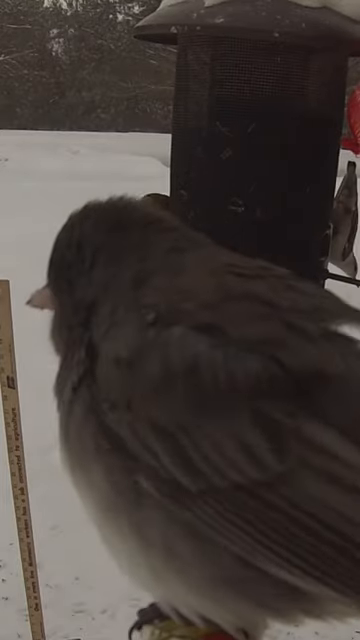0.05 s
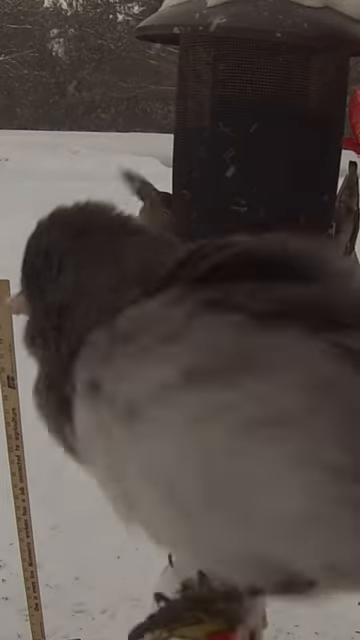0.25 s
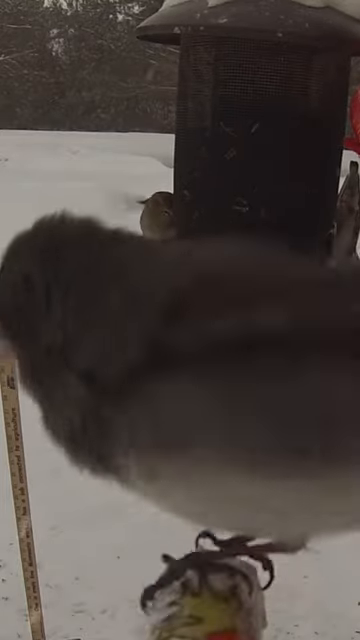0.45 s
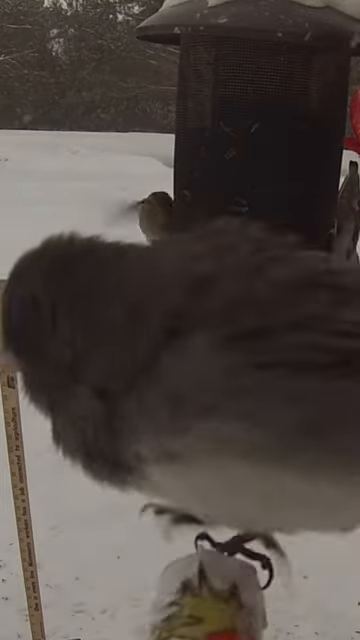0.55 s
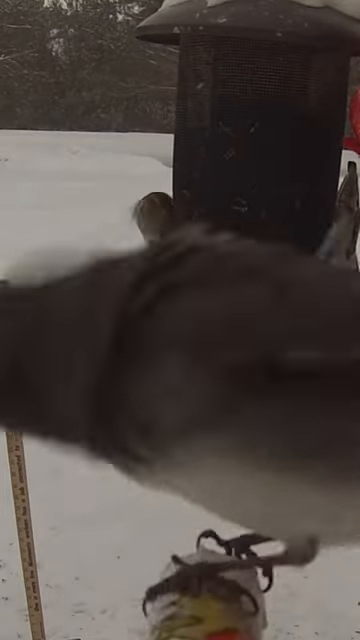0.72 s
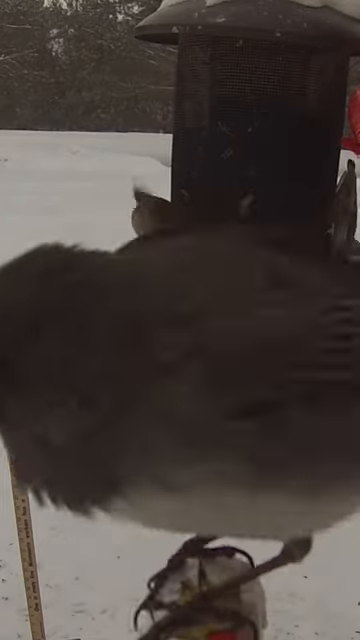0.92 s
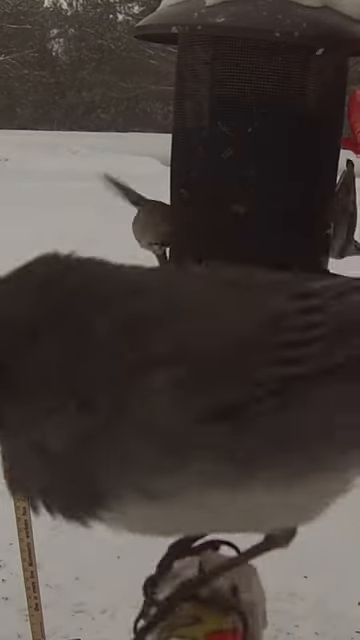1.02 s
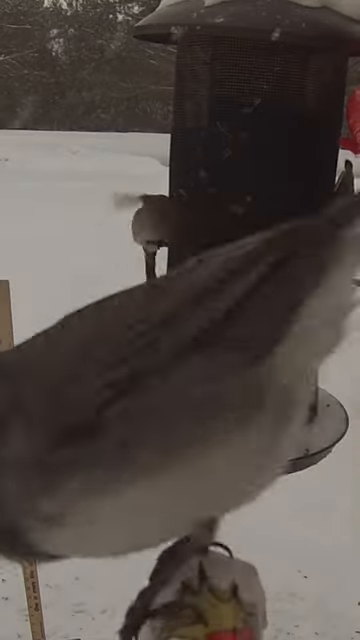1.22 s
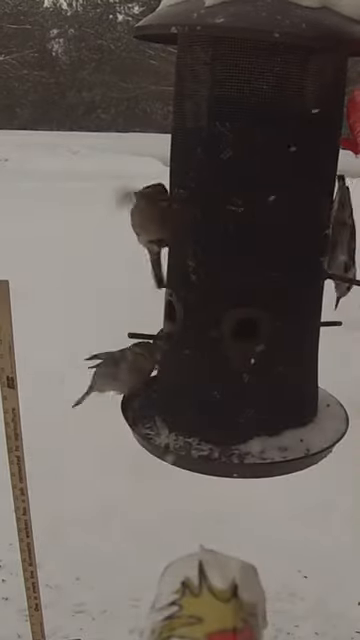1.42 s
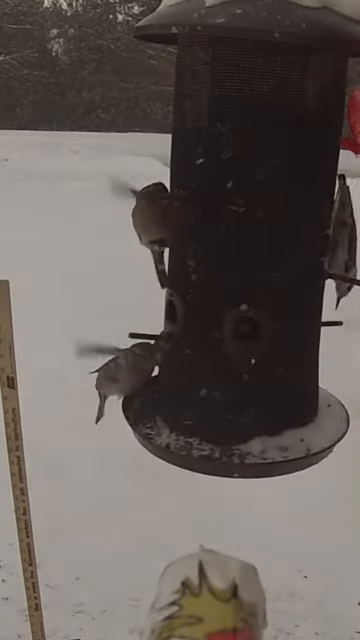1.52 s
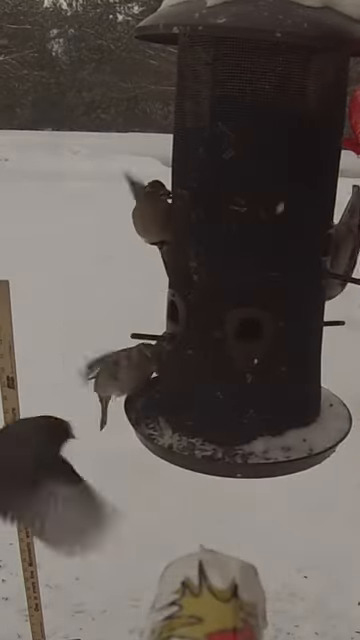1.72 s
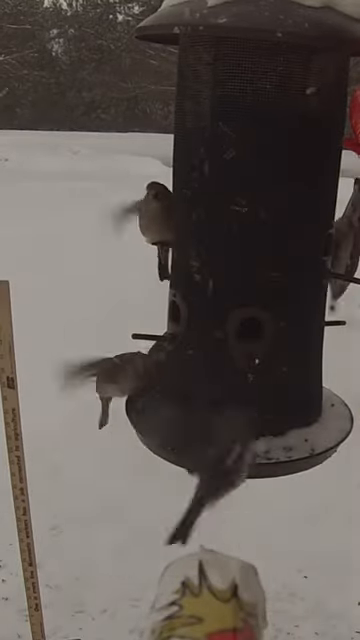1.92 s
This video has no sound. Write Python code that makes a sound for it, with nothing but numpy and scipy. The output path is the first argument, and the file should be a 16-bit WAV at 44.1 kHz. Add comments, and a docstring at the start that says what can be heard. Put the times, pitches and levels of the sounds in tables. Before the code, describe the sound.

A small bird shuffles on a perch right at the microphone, its claws tapping and scraping in quick, rattling clusters. It then flies off with soft wing thumps, leaving tiny ticks of icy snow over a faint outdoor rumble.

```python
"""Outdoors in falling snow, over a low, distant rumble, a small bird shuffles round on a perch fixed to
the microphone housing. Its feet knock, its claws scrape and its toes rub, and the perch rings with them.
It flicks a wing for balance, rustles its feathers and takes a few last steps. At about 1.3 s it leaves,
its wings pushing air on the microphone. Tiny icy ticks, sparse until then, go on landing close by."""
import sys
import numpy as np
from scipy import signal
from scipy.fft import rfft, irfft
from scipy.io import wavfile

SR = 44100
rng = np.random.default_rng(int(sys.argv[2]) if len(sys.argv) > 2 else 0)


def transcribe(signal):
    """Save signal, clipped to [-1, 1], as a 16-bit WAV file at the path in sys.argv[1]."""
    frames = np.atleast_2d(signal).T
    limited = np.clip(frames, -1, 1)
    pcm = np.round(limited * 32767).astype(np.int16)
    wavfile.write(sys.argv[1], SR, pcm)


N = 85995
T = np.arange(N) / SR


def from_db(db):
    """Decibels to gain."""
    return 10 ** (np.asarray(db) / 20)


def rms_one(x):
    """Scale to unit power."""
    return x / np.sqrt(np.mean(x ** 2) + 1e-20)


def decay(t60):
    """Gain per sample of a tail that falls 60 dB in t60 seconds."""
    return from_db(-60 / (t60 * SR))


def cut(x, hz, kind, order=1):
    """Butterworth low- or high-pass."""
    return signal.sosfilt(signal.butter(order, hz, kind, fs=SR, output="sos"), x + 1e-18)


def click(start):
    """A unit impulse at a time in seconds."""
    return 1. * (np.arange(N) == int(start * SR))


def ring(x, hz, t60):
    """A resonator: a click sets off a dying sine."""
    fall, turn = decay(t60), 2 * np.pi * hz / SR
    return signal.lfilter([0, np.sin(turn)], [1, -2 * fall * np.cos(turn), fall * fall], x + 1e-18)


def noise(spectrum):
    """Unit-power noise coloured by an EQ curve of (Hz, dB) points."""
    hz, db = np.transpose(spectrum)
    bins_hz = np.maximum(np.fft.rfftfreq(N, 1 / SR), 1)
    eq = from_db(np.interp(np.log(bins_hz), np.log(hz), db))
    return rms_one(irfft(rfft(rng.standard_normal(N)) * eq, N))


def swells(rows, rise):
    """A rounded rise and fall for each (start, length, dB); rise is the attack's share of the length."""
    envelope = np.zeros(N)
    for start, length, db in rows:
        triangle = np.interp(T, [start, start + rise * length, start + length], [0, 1, 0])
        envelope += from_db(db) * np.sin(np.pi / 2 * triangle)
    return envelope


# The colours of the outdoor air and the rumble. Each row: frequency in Hz, relative level in dB.
AIR = [(15, -25), (25, 0.5), (71, -5), (164, 0.5), (209, -3), (274, -1.5), (399, -12.5), (802, -8.5),
       (1170, -22), (2000, -23.5), (2350, -26), (2690, -27), (3160, -27), (13500, -42.5), (15400, -55)]
RUMBLE = [(20, -5), (80, -22.5), (105, 2), (124, -12), (150, -1), (220, -22), (285, -13), (360, -19.5),
          (700, -26), (2000, -70.5)]
# The rumble's fader ride. Each row: time in seconds, level in dB.
RUMBLE_LEVEL = [(0, -74), (.11, -47.5), (.35, -43.5), (.6, -47.5), (1.0, -48.5), (1.25, -52), (1.6, -59),
                (1.95, -51.5)]


def background(air_db=-53.5):
    """A steady bed of distant air under a low rumble that swells and ebbs."""
    rumble_gain = from_db(np.interp(T, *np.transpose(RUMBLE_LEVEL)))
    return from_db(air_db) * noise(AIR) + rumble_gain * noise(RUMBLE)


# Icy snow landing. Each row: start in seconds, ring level in dB, pitch in Hz, ring t60 in seconds,
# crackle level in dB.
TICKS = [(.2442, -35.5, 11200, 0.0015, -64), (.651, -44, 5460, .004, -44.5),
         (1.0855, -54, 6000, 0.0036, -50), (1.3095, -48.5, 1440, 0.0094, -58),
         (1.3845, -53, 12300, .003, -54), (1.39, -43, 11400, 0.002, -71),
         (1.410, -38.5, 12150, 0.0029, -41), (1.4295, -51, 8640, 0.0033, -53),
         (1.449, -50, 5200, 0.0088, -48.5), (1.5145, -40, 1490, 0.0027, -60),
         (1.6065, -48.5, 2900, 0.015, -42.5), (1.617, -41.5, 1750, 0.0017, -55),
         (1.8902, -25.5, 2370, 0.011, -40.5), (1.8942, -26, 2470, 0.0033, -57),
         (1.8965, -38, 5300, 0.0074, -46), (1.9238, -25.5, 3330, 0.0017, -62),
         (1.9248, -31, 5940, 0.0032, -39)]


def icy_ticks(crackle_t60_s=0.0092, crackle_top_hz=9260):
    """Each grain lands with one short ring and a pinch of crackle."""
    rings = sum(from_db(db) * ring(click(start), hz, t60) for start, db, hz, t60, _ in TICKS)
    hits = sum(from_db(db) * click(start) for start, _, _, _, db in TICKS)
    tails = signal.lfilter([1], [1, -decay(crackle_t60_s)], hits + 1e-18)
    return rings + cut(tails * rng.standard_normal(N), crackle_top_hz, "low", order=2)


# Body rustles and the wing swish. Each row: start in seconds, length in seconds, level in dB.
RUSTLES = [(.83, 0.021, -58), (.895, 0.032, -54), (1.005, 0.077, -62), (1.075, .035, -57.5)]
SWISHES = [(1.37, 0.11, -66.5)]
# Their colours, the swish the brighter. Each row: frequency in Hz, relative level in dB.
RUSTLE_EQ = [(800, -15), (1800, -0.5), (2500, 3), (3500, -11), (5000, -22), (9000, -44), (15000, -26)]
SWISH_EQ = [(1500, -17), (3500, -1), (8000, -16), (12500, -8), (14500, -13)]


def feathers():
    """Feathers brush softly on the perch, then slide over each other as the wings work."""
    return swells(RUSTLES, rise=0.51) * noise(RUSTLE_EQ) + swells(SWISHES, rise=0.62) * noise(SWISH_EQ)


# Puffs of air off the wings. Each row: start in seconds, length in seconds, level in dB.
PUFFS = [(.27, 0.11, -39), (.745, 0.029, -32), (.79, 0.025, -39), (1.31, 0.087, -44.5),
         (1.39, 0.107, -44.5), (1.47, 0.21, -48)]
# Their bass-heavy colour. Each row: frequency in Hz, relative level in dB.
PUFF_EQ = [(20, 2), (50, -4), (90, -8), (160, -10.5), (300, -11.5), (700, -36.5), (2000, -36),
           (15000, -100)]
# One flick for balance, then the take-off beats. Each row: start in seconds, level in dB, pitch in Hz.
WINGBEATS = [(.755, -31.5, 86), (1.327, -34.5, 70), (1.363, -28, 121), (1.3925, -39, 60.4),
             (1.411, -33, 55), (1.448, -48, 40), (1.494, -47, 35.2)]


def wings(beat_t60_s=0.058):
    """The wings push air on the microphone: breathy puffs, and a low thump for each beat."""
    beats = sum(from_db(db) * ring(click(start), hz, beat_t60_s) for start, db, hz in WINGBEATS)
    return swells(PUFFS, rise=0.28) * noise(PUFF_EQ) + beats


def slips(per_s, spread_db=3):
    """Stick-slip friction: random tiny clicks of uneven size, unit power."""
    slipping = rng.random(N) < per_s / SR
    sizes = from_db(spread_db * rng.standard_normal(N))
    return rms_one(slipping * sizes * rng.choice([-1, 1], N))


def knock(start, hz, skid_to_push=0.59, skid_fade_s=0.0039, contact_q=1.7):
    """A foot lands: a push and a brief skid, through a springy contact that rebounds once or twice."""
    since = T - start
    skid = slips(per_s=2400) * (since > 0) * np.exp(-np.abs(since) / skid_fade_s)
    skid = rms_one(skid) / np.sqrt(N)  # unit energy, like the click
    landing = (click(start) + skid_to_push * skid) / np.hypot(1, skid_to_push)
    omega = 2 * np.pi * hz
    spring = signal.bilinear([omega, 0], [1, omega / contact_q, omega * omega], SR)
    return signal.lfilter(*spring, landing + 1e-18)


# Footfalls. Each row: start in seconds, force in dB, pitch of the contact in Hz.
STEPS = [(.041, -45, 774), (.129, -34.5, 1110), (.166, -35.5, 1300), (.204, -29, 1200), (.2272, -17, 1350),
         (.2495, -20.5, 1150), (.2705, -24.5, 1200), (.292, -20.5, 1250), (.3025, -28, 1200),
         (.3105, -14.5, 1170), (.3695, -21.5, 1200), (.382, -16, 900), (.4055, -60, 1490),
         (.4395, -40.5, 1100), (.481, -39.5, 1300), (.5195, -21, 900), (.528, -34, 900), (.576, -35, 1200),
         (.6215, -44, 1500), (.6785, -19, 1450), (.7022, -30, 1400), (.709, -12.5, 1300),
         (.7145, -13, 1100), (.729, -11, 1300), (.735, -12.5, 990), (.7505, -31, 1400), (.7932, -9, 1200),
         (.7996, -9, 2340), (.8002, -14.5, 1050), (.8125, -36, 1200), (.821, -26.5, 1100),
         (.890, -35, 1300), (.936, -38, 1200), (.9565, -25.5, 1300), (.9775, -17.5, 2550),
         (.979, -10, 1660), (.982, -16.5, 900), (.998, -28.5, 850), (1.0435, -42, 1400),
         (1.0565, -38, 1300), (1.131, -39.5, 1030), (1.1745, -28.5, 1400), (1.203, -40, 1300),
         (1.244, -38, 1150)]
# Claw scrapes. Each row: start in seconds, length in seconds, force in dB.
SCRAPES = [(.098, 0.019, -59), (.122, .022, -65.5), (.153, 0.01, -61), (.163, 0.0036, -47),
           (.192, 0.014, -44), (.199, 0.0071, -54), (.218, 0.014, -36), (.244, 0.0063, -36),
           (.270, 0.023, -42.5), (.289, 0.0034, -46), (.301, 0.0039, -38), (.308, 0.0039, -29.5),
           (.332, 0.012, -48), (.345, 0.011, -49), (.360, 0.0062, -38), (.369, 0.0099, -33),
           (.3785, 0.0048, -34), (.391, .006, -61), (.477, 0.0083, -53.5), (.514, 0.0027, -34.5),
           (.517, 0.0077, -44), (.549, 0.029, -52), (.572, 0.0052, -44), (.620, 0.0068, -53.5),
           (.667, 0.0042, -44), (.676, 0.012, -43.5), (.687, 0.0097, -35), (.701, 0.0022, -46),
           (.7085, 0.005, -41), (.727, 0.012, -32.5), (.740, 0.011, -39.5), (.750, 0.002, -30.5),
           (.761, 0.0068, -46), (.793, 0.0053, -26), (.7995, 0.0031, -27.5), (.812, .003, -43),
           (.953, 0.0066, -52), (.977, 0.004, -35), (1.009, 0.003, -59.5), (1.017, 0.0074, -56.5),
           (1.043, .005, -58), (1.055, 0.0065, -67), (1.083, 0.0066, -58), (1.144, 0.0051, -53.5),
           (1.171, 0.01, -51.5), (1.204, 0.0062, -50), (1.2355, 0.0063, -43.5), (1.252, .007, -41),
           (1.26, 0.0036, -54)]
# The toes rubbing as the weight shifts. Each row: time in seconds, force in dB.
RUB = [(0, -119), (.07, -86), (.13, -64), (.19, -63.5), (.24, -57), (.33, -61), (.40, -57.5), (.43, -105),
       (.505, -107), (.53, -58.5), (.58, -61), (.61, -77.5), (.66, -66.5), (.69, -51.5), (.74, -54),
       (.78, -62), (.84, -62.5), (.875, -72), (.95, -65), (.99, -57.5), (1.04, -72), (1.16, -74.5),
       (1.21, -64.5), (1.26, -63.5), (1.30, -90), (1.36, -110)]


def feet(claw_low_hz=2700, rub_top_hz=4000, rub_flicker_db=2):
    """Force on the perch: knocks, bright claw scrapes and a dull, uneven rub."""
    knocks = sum(from_db(db) * knock(start, hz) for start, db, hz in STEPS)
    scrapes = cut(swells(SCRAPES, rise=0.4) * slips(per_s=8000), claw_low_hz, "high")
    flicker_db = rub_flicker_db * rms_one(cut(rng.standard_normal(N), 60, "low", order=2))
    rub_gain = from_db(np.interp(T, *np.transpose(RUB)) + flicker_db)
    rub = cut(rub_gain * slips(per_s=2500), rub_top_hz, "low")
    return knocks + scrapes + rub


def mode(force, hz, t60, build_up_s=0.00069):
    """A mode swells briefly as the wave spreads through the body, then dies away."""
    turn = np.exp(2j * np.pi * hz / SR)
    rise = np.exp(-1 / (build_up_s * SR))
    poles = [decay(t60) * turn, rise * turn]
    return signal.lfilter([1 - rise], np.poly(poles), force + 1e-18).imag


# The pitches of the perch's modes in Hz, low to high.
PERCH_HZ = [535, 651, 780, 829, 1028, 1144, 1196, 1403, 1515, 1640, 2262, 2422, 2575, 3100, 3300, 3465,
            3650, 3900, 4720, 5200, 5770, 6280, 6620, 9370, 11200]
# How those modes ring, in the same order. Each row: gain in dB, t60 in seconds.
PERCH_RING = [(-38.5, 0.026), (-15.5, 0.13), (-8, 0.041), (-1, 0.038), (-4, 0.022), (-13, 0.054),
              (-8.5, 0.02), (-7.5, 0.022), (-30, 0.019), (-35, 0.03), (-17, 0.025), (-21.5, 0.034),
              (-47, 0.044), (-21.5, 0.016), (-13, 0.013), (-9, 0.008), (-21.5, 0.018), (-55, 0.029),
              (-20, 0.017), (-24, 0.0094), (-31.5, 0.025), (-22, 0.01), (-24, 0.0091), (-29, 0.0062),
              (-66, 0.00092)]
# Gaps between groups of modes. Each row: centre in Hz, width in Hz.
DEAD_BANDS = [(1950, 426), (4220, 68), (10200, 490)]


def perch(force, low_cut_hz=543):
    """The perch rings in its modes; it carries little bass and nothing in the gaps between their groups."""
    body = sum(from_db(db) * mode(force, hz, t60) for hz, (db, t60) in zip(PERCH_HZ, PERCH_RING))
    for hz, width in DEAD_BANDS:
        body = signal.lfilter(*signal.iirnotch(hz, hz / width, SR), body)
    return cut(body, low_cut_hz, "high", order=3)


def scene():
    """Background, bird and icy ticks, mixed in mono."""
    return (background() + perch(feet()) + feathers() + wings() + icy_ticks())[None]


def record(dry, cutoff_hz=15000):
    """A steep low-pass takes off the very top."""
    return signal.sosfilt(signal.ellip(10, .1, 80, cutoff_hz, fs=SR, output="sos"), dry)


dry = scene()
out = record(dry)
transcribe(out)
```